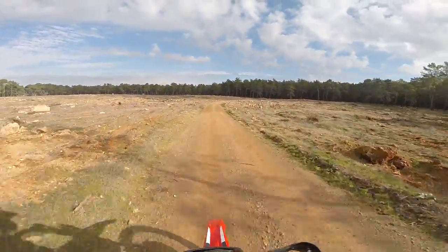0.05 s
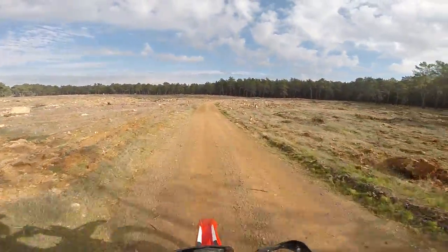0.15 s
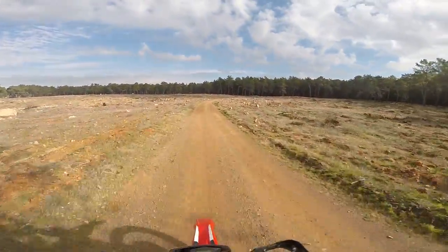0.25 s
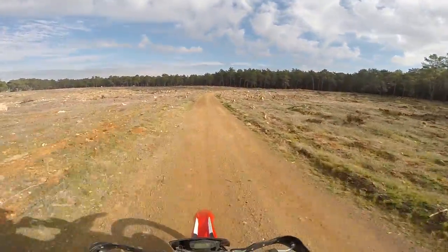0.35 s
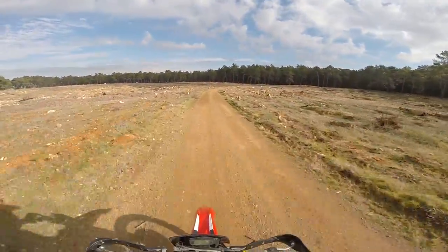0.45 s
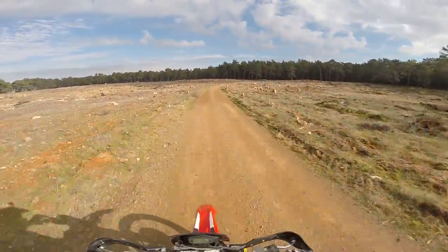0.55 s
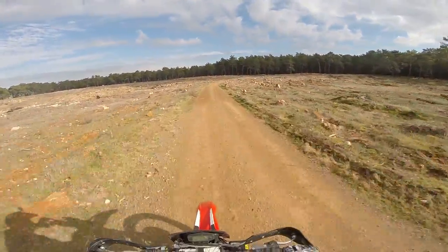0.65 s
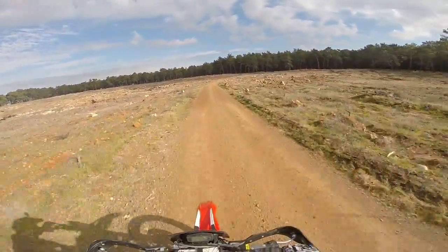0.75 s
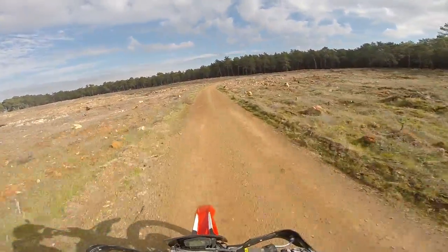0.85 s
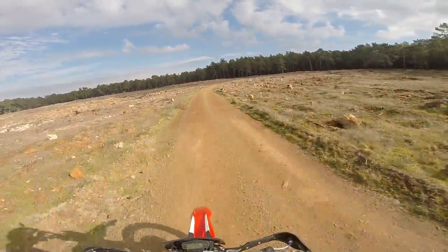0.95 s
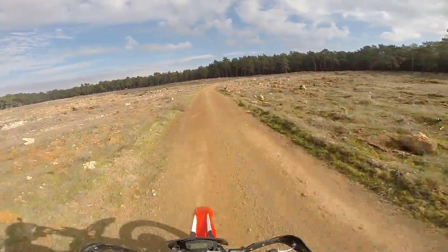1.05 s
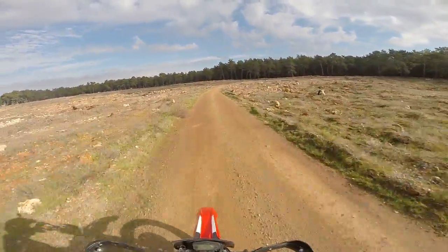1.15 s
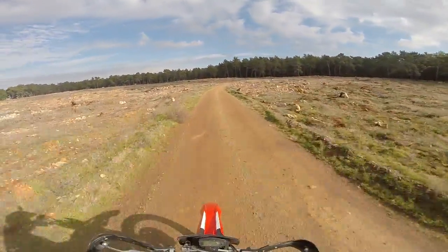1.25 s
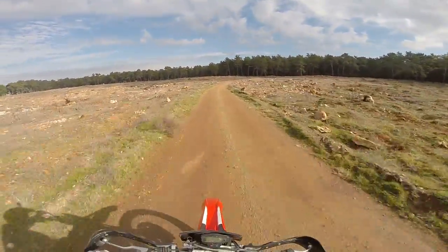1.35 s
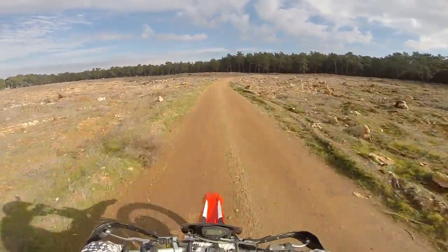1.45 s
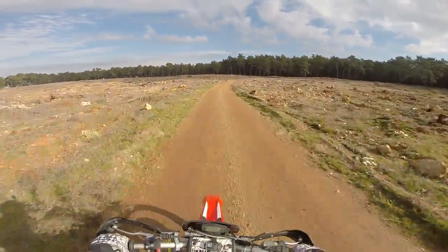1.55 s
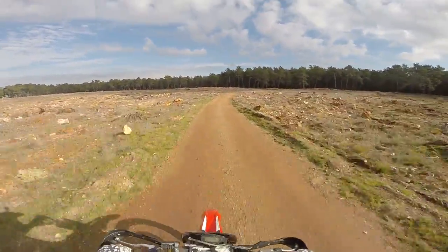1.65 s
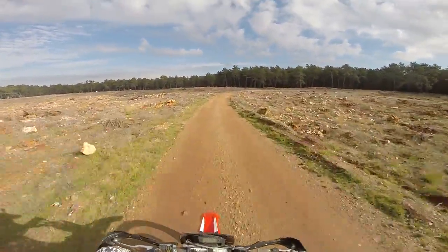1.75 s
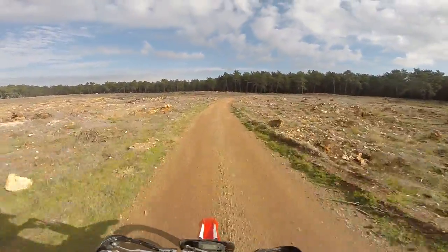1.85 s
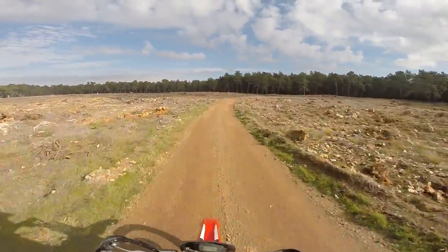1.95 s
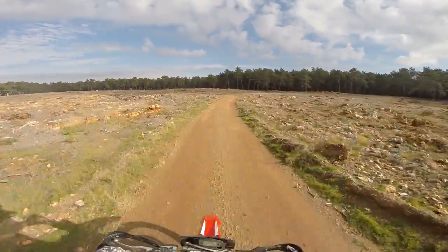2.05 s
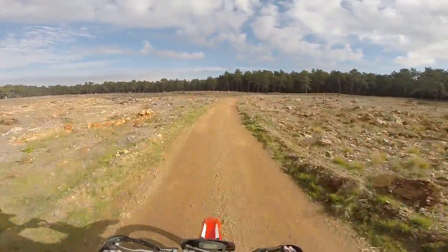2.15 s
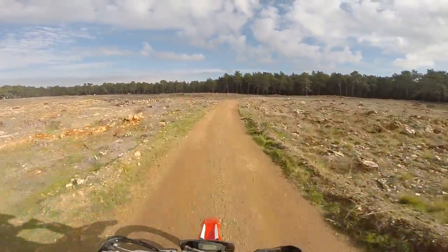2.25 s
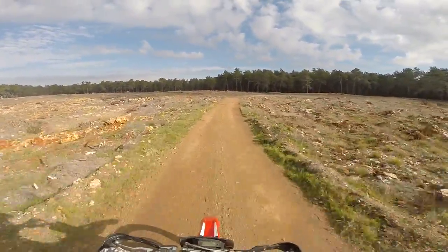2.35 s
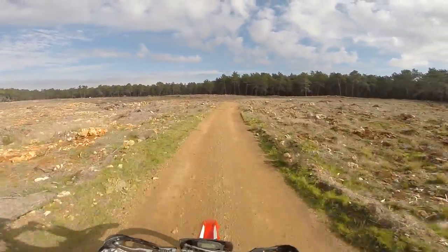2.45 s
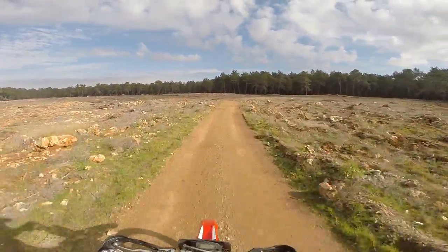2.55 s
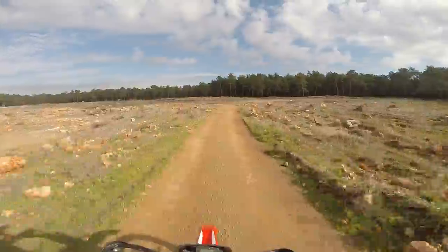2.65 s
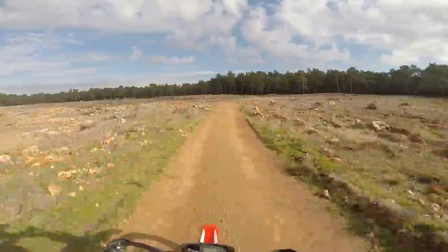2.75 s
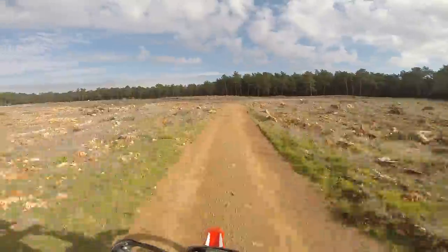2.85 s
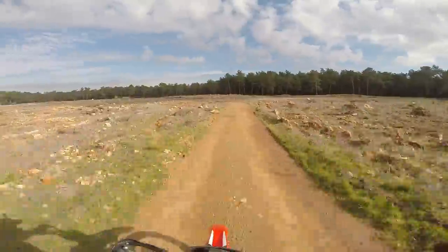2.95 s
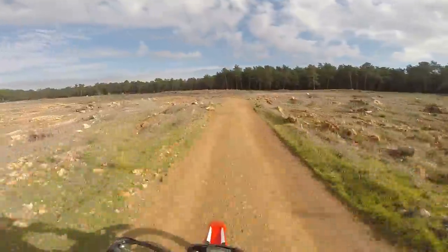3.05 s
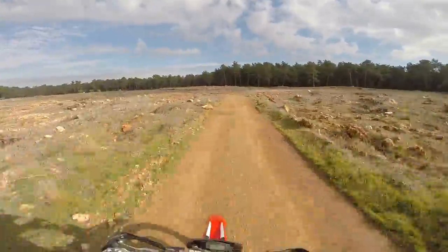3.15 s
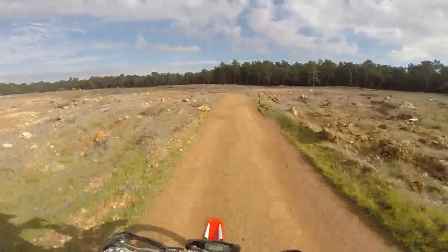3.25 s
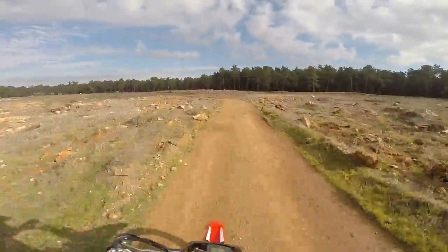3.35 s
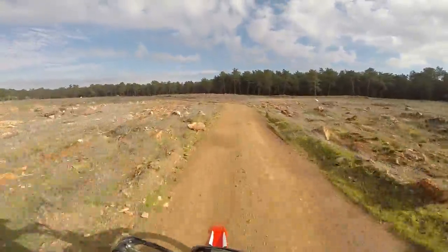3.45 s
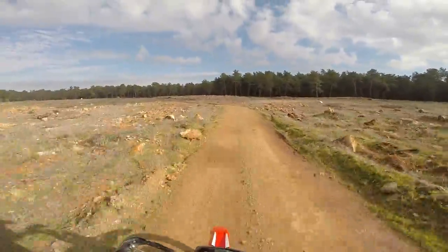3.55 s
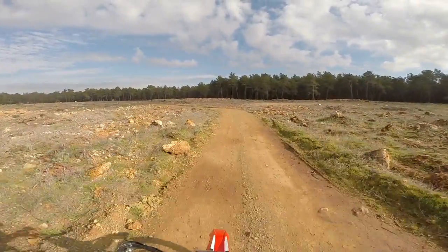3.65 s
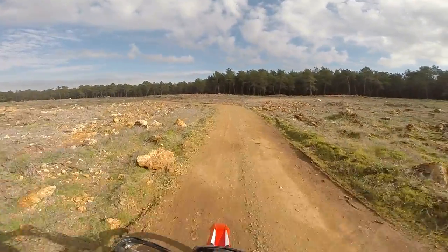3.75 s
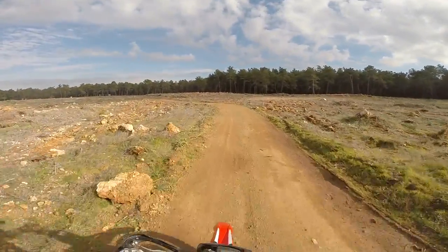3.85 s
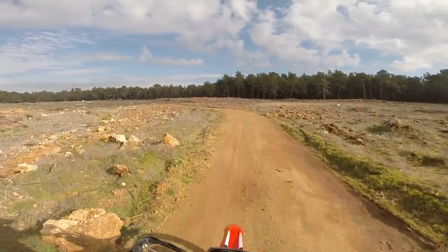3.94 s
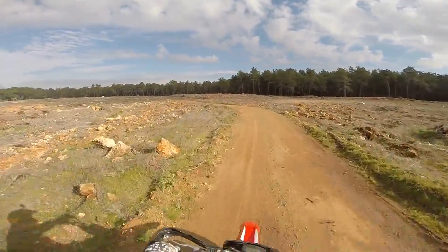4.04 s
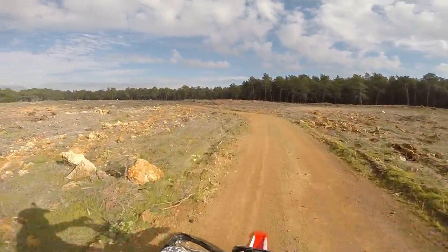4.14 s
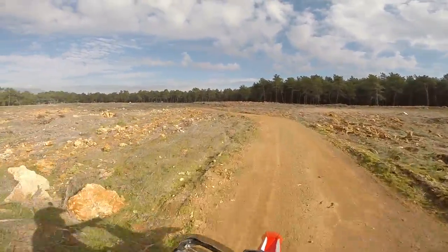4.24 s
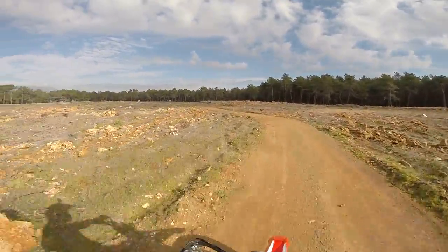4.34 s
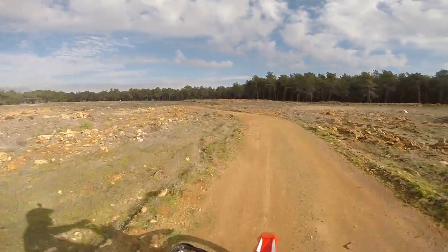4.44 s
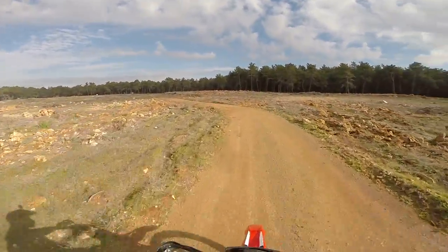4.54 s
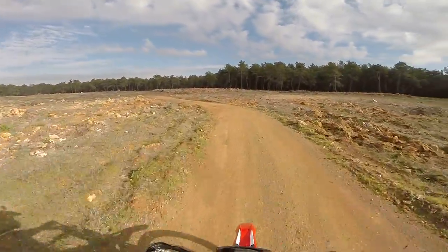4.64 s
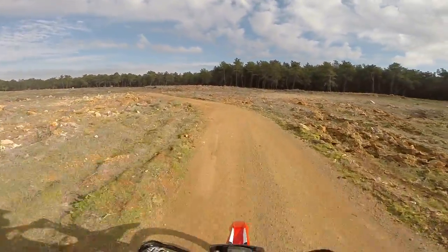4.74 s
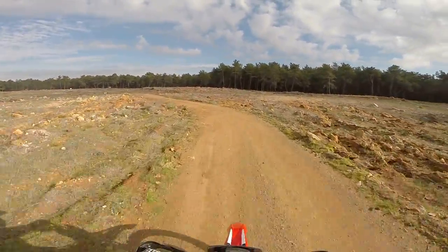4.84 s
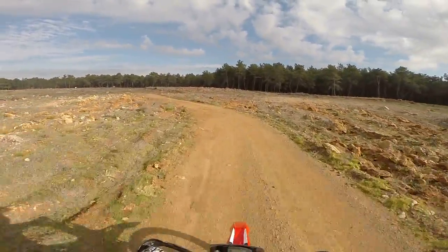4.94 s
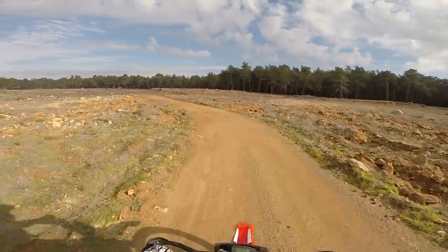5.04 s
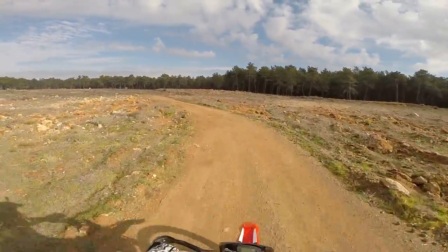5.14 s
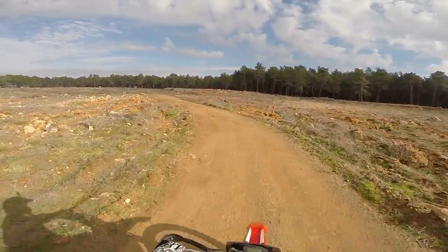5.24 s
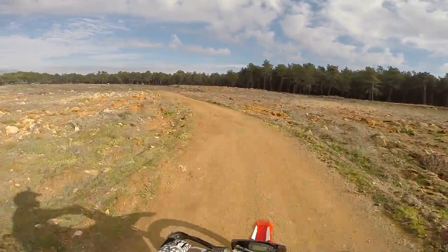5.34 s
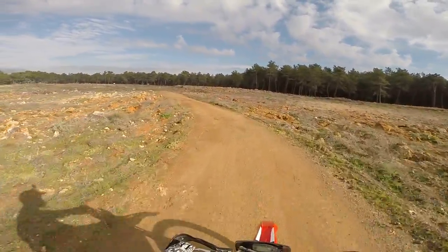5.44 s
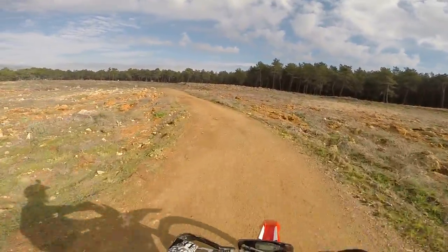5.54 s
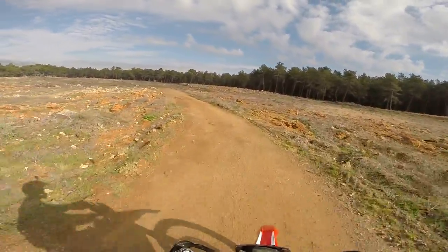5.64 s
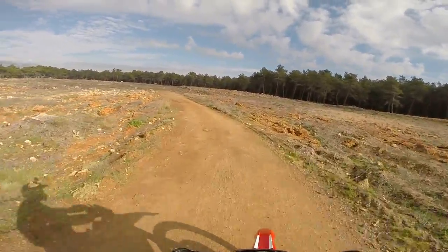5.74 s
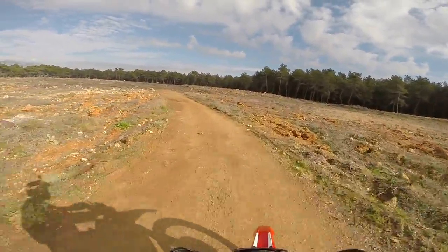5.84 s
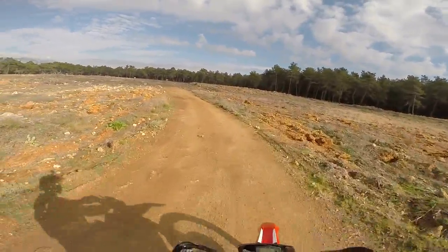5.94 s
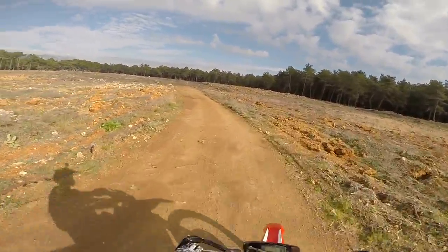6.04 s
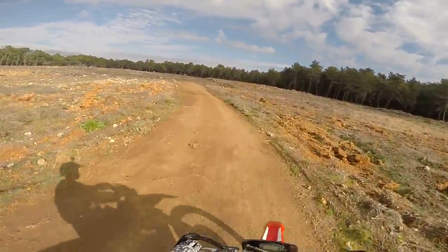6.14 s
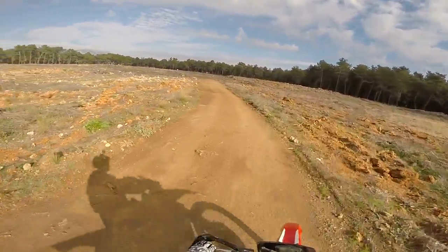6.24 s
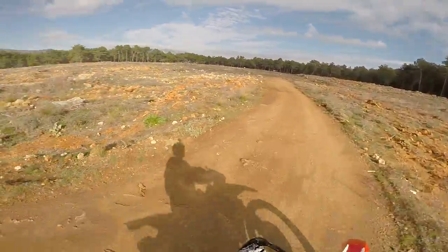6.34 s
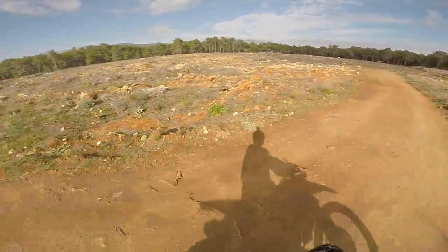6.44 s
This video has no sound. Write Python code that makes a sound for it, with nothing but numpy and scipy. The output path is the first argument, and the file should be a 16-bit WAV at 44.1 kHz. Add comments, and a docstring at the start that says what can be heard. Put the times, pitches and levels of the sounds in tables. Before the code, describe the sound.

Dirt bike engine pulls up through the revs, drops at a gear change, then runs down as helmet wind fades, with brake squeaks and a tyre groan.

```python
"""A single-cylinder dirt bike on a dirt trail, heard from a camera on the rider's helmet.
The engine, a sum of firing harmonics with noise bursts, pulls up through the revs, then runs down.
Wind is noise through the resonances of camera case and helmet, over a soft steady bed of coloured noise.
Grit rings the case as decaying sines, and a hard hit makes the limiter duck. Brake squeaks are gliding
sines; the rear tyre's knobs hum and slow under the brake, amid a low rumble of narrow-band noise."""
import sys
import numpy as np
from scipy import signal
from scipy.fft import rfft, irfft
from scipy.io import wavfile
from scipy.ndimage import uniform_filter1d

SR = 44100
rng = np.random.default_rng(int(sys.argv[2]) if len(sys.argv) > 2 else 0)


def master_out(mix):
    """Clip the mix to full scale and print it as 16-bit PCM to the path in sys.argv[1]."""
    frames = np.transpose(np.atleast_2d(mix))
    ceiling = np.clip(frames, -1, 1)
    pcm = np.round(ceiling * 32767).astype(np.int16)
    wavfile.write(sys.argv[1], SR, pcm)


N = 286204
TIME = np.arange(N) / SR
FREQ = np.maximum(np.fft.rfftfreq(N, 1 / SR), 1)

# resonances of the camera case: centre_hz, width_hz, relative_gain_db
CASE_MODES = [(1216, 104, -14.5), (1554, 202, -0.27), (2070, 566, -4), (2513, 243, -1), (2716, 130, -0.5),
              (3354, 306, -1.5), (3556, 220, 0), (4040, 595, -11.5), (5136, 230, -15), (5720, 770, -13.5),
              (7580, 1250, -24.5), (9000, 1430, -30), (10390, 1150, -29), (13800, 1500, -42.5)]
# strength of the air stream, dying away as the bike slows: time_s, rush_db
AIR_STREAM = [(0, -18.5), (.3, -16), (1.0, -20), (1.43, -14.5), (1.6, -16), (2.8, -16), (3.6, -20.5),
              (4.15, -23), (4.75, -26.5), (5, -29), (5.85, -32), (6.49, -40)]


def from_db(db):
    """Decibels to amplitude gain: 20 dB is a factor of ten."""
    return 10 ** (np.asarray(db) / 20)


def rms_one(x):
    """Normalise the mean power: scale to rms 1."""
    return x / np.sqrt(np.mean(x ** 2) + 1e-20)


def in_time(rows):
    """Linear interpolation: each column of a curve at every sample."""
    s, *columns = np.transpose(rows)
    return [np.interp(TIME, s, column) for column in columns]


def at_hz(spectrum, hz):
    """Interpolation on a logarithmic frequency axis: level of an outline at the given frequencies."""
    points_hz, db = np.transpose(spectrum)
    return np.interp(np.log(hz), np.log(points_hz), db)


def swells(rows):
    """Raised-cosine envelopes: a smooth bump for each row of centre_s, length_s, height."""
    total = 0
    for s, length_s, height in rows:
        half_turns = np.clip((TIME - s) / length_s, -.5, .5)
        total = total + height * np.cos(np.pi * half_turns) ** 2
    return total


def drift(rate_hz):
    """Low-passed noise: slow random wandering of rms 1, from two equal poles at rate_hz."""
    step = 20  # computed at every 20th sample, then interpolated
    r = np.exp(-2 * np.pi * rate_hz * step / SR)
    noise = rng.standard_normal(N // step + 2002)
    slow = signal.lfilter([1], [1, -2 * r, r * r], noise)[2000:]  # drop the filter's start
    return np.interp(np.arange(N) / step, np.arange(len(slow)), rms_one(slow))


def coloured(x, spectrum):
    """Spectral shaping: multiply the spectrum by an outline."""
    return irfft(rfft(x) * from_db(at_hz(spectrum, FREQ)), N)


def resonate(x, hz, width_hz):
    """Two equal resonators in cascade: about unit gain on top, steep skirts."""
    # each section is wider, so that the pair together has the given width
    r = np.exp(-np.pi * width_hz / np.sqrt(np.sqrt(2) - 1) / SR)
    gain = (1 - r * r) / 2
    section = [gain, 0, -gain, 1, -2 * r * np.cos(2 * np.pi * hz / SR), r * r]
    return signal.sosfilt([section, section], x)


def evened(x, span_s):
    """Running power normalisation: hold the rms over each span at 1."""
    power = uniform_filter1d(x * x, max(int(span_s * SR), 2))
    return x / np.sqrt(np.maximum(power, 1e-12))


def exhaust(rate, cycles, throttle, rough=0.18, count=26):
    """Fourier synthesis: firing harmonics in scattered phase, fluttering with uneven combustion."""
    # exhaust as it reaches the helmet, throttle open: frequency_hz, relative_db
    pulling = [(25, -14), (46, 5.5), (70, -6.5), (92, 5.5), (130, -3.5), (180, -1.5), (225, 1), (285, -2),
               (335, -13.5), (440, -2), (560, -13), (700, -11.5), (790, -5), (930, -21.5), (1220, -3.5),
               (2400, -2)]
    # the same, throttle shut: frequency_hz, relative_db
    coasting = [(22, -18), (45, -7.5), (62, 2.5), (90, -4.5), (120, -2), (175, -2.5), (230, -14.5),
                (285, -17), (345, -23), (405, -11.5), (470, -26), (550, -25.5), (1500, -25)]
    out, power = 0, 0
    for k in np.arange(count) + 1:
        open_db, shut_db = at_hz(pulling, k * rate), at_hz(coasting, k * rate)
        gain = from_db(throttle * open_db + (1 - throttle) * shut_db)
        phase = 2 * np.pi * (k * cycles + rng.random())  # the silencer smears the phases
        in_phase = np.cos(phase) * (1 + rough * drift(16.0))
        quadrature = np.sin(phase) * rough * drift(22)
        out = out + gain * (in_phase + quadrature)
        power = power + gain ** 2 * (.5 + rough ** 2)
    return out / np.sqrt(power)


def engine(rasp_db=-7.5, load_rasp_db=12.0, rasp_decay=1.0, exhaust_db=-1.0):
    """Periodic excitation: the exhaust note, and valve and gas rasp that decays after each firing."""
    # pulling up, changing gear and running down: time_s, firings_per_s
    engine_speed = [(0, 45.3), (.14, 46.5), (.5, 47.8), (.75, 55.5), (.92, 58.8), (1.02, 62.5),
                    (1.12, 69.9), (1.3, 74.6), (1.5, 76.3), (1.6, 55.5), (1.85, 57), (3.25, 46.3),
                    (4.05, 40.8), (4.7, 33), (5.3, 29.5), (6.49, 21.6)]
    # eased at the gear change and low thereafter: time_s, throttle_0_to_1
    throttle_curve = [(0, 0.87), (.45, .75), (.6, 0.97), (1.48, 0.97), (1.56, 0.06), (2.5, 0.24),
                      (3.4, 0.2)]
    # common level before the exhaust and rasp trims, at throttle 0 and the middling speed
    base_db, middle_firings_per_s = -35, 52
    load_db, rev_db_per_octave = 6.5, 3.5

    rate, = in_time(engine_speed)
    throttle = np.clip(in_time(throttle_curve)[0], 0, 1)
    octaves = np.log2(rate / middle_firings_per_s)
    level_db = base_db + load_db * throttle + rev_db_per_octave * octaves
    cycles = np.cumsum(rate) / SR
    bursts = rng.standard_normal(N) * np.exp(-rasp_decay * (cycles % 1))
    rasp = 0
    for k, (hz, width_hz, db) in enumerate(CASE_MODES[:10]):
        rasp = rasp + (-1) ** k * from_db(db) * resonate(bursts, hz, width_hz)
    note = from_db(exhaust_db) * exhaust(rate, cycles, throttle)
    rasp = from_db(rasp_db + load_rasp_db * throttle) * rms_one(rasp)
    return from_db(level_db) * (note + rasp)


def wind_rush(hiss_db=28.5, flutter_db=0.23, patchy_db=0.66, grain_db=1.0, rush_db=-0.22, broad_db=-15.5):
    """Turbulent excitation of resonances: the high case modes follow the fine hiss of the stream."""
    # level of the high hiss, before the hiss_db offset: time_s, relative_db
    hiss_curve = [(0.0, -51.5), (0.196, -47), (0.48, -45), (1.1, -44.5), (1.26, -43), (1.74, -46),
                  (3.11, -44), (3.23, -47), (4.04, -51), (4.39, -48.5), (4.87, -61), (5.86, -67.5),
                  (6.49, -79)]
    # the stream surges or slackens briefly: centre_s, length_s, change_db
    surges = [(.07, 0.15, -5.5), (3.02, 0.33, -3), (3.25, 0.34, 2), (3.74, 0.081, -3), (4.3, .2, -2),
              (4.63, 0.25, 1), (5.0, 0.25, -2.5), (5.3, .2, 3), (6.1, .18, -3), (6.23, 0.26, 2.5)]
    # broad turbulence under the resonances: frequency_hz, relative_db_per_hz
    turbulence = [(30, 3), (70, -6), (130, 4), (210, -16.5), (280, -6.5), (500, -11.5), (950, -11),
                  (1500, -13), (3800, -15), (5000, -37), (9000, -30.5), (15000, -60)]

    rush = in_time(AIR_STREAM)[0] + swells(surges)
    hiss = in_time(hiss_curve)[0] + hiss_db
    out, steady = 0, 0
    for hz, width_hz, db in CASE_MODES:
        mode_db = db + patchy_db * drift(17.4) + grain_db * drift(165)
        mode = from_db(mode_db) * resonate(rng.standard_normal(N), hz, width_hz)
        high = np.clip(np.log2(hz / 3200) / 0.59, 0, 1)  # 0 follows the rush, 1 the hiss
        out = out + mode * from_db((1 - high) * rush + high * hiss)
        steady = steady + mode
    broad = from_db(rush + broad_db) * rms_one(coloured(rng.standard_normal(N), turbulence))
    return from_db(rush_db + flutter_db * drift(25)) * out / np.std(steady) + broad


def wind_rumble(throb_span_s=0.18):
    """Beating of close modes: helmet resonances throb, and eddies thump on the microphone."""
    # resonances of the helmet: centre_hz, width_hz, relative_gain_db
    helmet_modes = [(165.1, 14.5, 2), (184.8, 16.9, -1.5), (122, 66, -14.5), (427, 42, -29), (617, 29, -25)]
    # spectrum of the eddies: frequency_hz, relative_db_per_hz
    eddy_spectrum = [(5, -4), (12, 2), (25, -6), (42, -5.5), (58, -18), (120, -24), (300, -48),
                     (2000, -110)]
    # the strongest booms in the helmet: centre_s, length_s, rise_db
    booms = [(.32, 0.066, 3), (1.03, .14, 5), (1.533, .12, 7.5), (1.652, 0.099, 7.5), (2.8, 0.37, 2.5),
             (3.033, 0.24, 5.5)]
    # gusts that thump on the microphone: centre_s, length_s, rise_db
    gusts = [(1.775, .26, 14), (2.9, 0.45, 5), (3.92, 0.52, 13), (4.102, .2, 16), (4.4, 0.28, 15.5),
             (5.714, 0.14, 10)]
    # levels at the reference rush, and the share of the rush's swing that each follows
    reference_rush_db = -17
    boom_db, boom_follows = -26.5, 0.8
    buffet_db, buffet_follows = -35, 0.16

    stream_db = in_time(AIR_STREAM)[0] - reference_rush_db
    boom = boom_db + boom_follows * stream_db + swells(booms)
    buffet = buffet_db + buffet_follows * stream_db + swells(gusts)
    cavity = 0
    for hz, width_hz, db in helmet_modes:
        cavity = cavity + from_db(db) * resonate(rng.standard_normal(N), hz, width_hz)
    eddies = coloured(rng.standard_normal(N), eddy_spectrum)
    return from_db(boom) * evened(cavity, throb_span_s) + from_db(buffet) * evened(eddies, 0.19)


def noise_bed(level_db=-50.0):
    """Stationary coloured noise: a soft steady bed beneath everything."""
    # frequency_hz, relative_db
    outline = [(100, -12), (300, -1), (750, -0.5), (1400, 5), (2000, -4), (4000, -19), (15000, -72)]
    return from_db(level_db) * rms_one(coloured(rng.standard_normal(N), outline))


def stones():
    """Impulse response as damped modes: grit ticks on the case; soft clods ring chiefly its low modes."""
    # grit on the case: start_s, strength_db, brightness_db_per_octave
    grit = [(.2819, -22, 10), (.5133, 7.5, 3), (1.2526, -20, 9), (1.5919, -25, 11), (1.6744, -12.5, -10.5)]
    # what a grain sets ringing: frequency_hz, relative_db, t60_s
    case_ringing = [(754, -34, 0.013), (1610, -15, 0.017), (2540, -7, 0.014), (3580, -11.5, .008),
                    (5250, -9.5, 0.0073), (6440, -10.5, 0.0082), (7584, -7, 0.0077), (8460, -14.5, 0.015),
                    (9190, -10, 0.012), (10870, -8, 0.0031), (13500, -13, 0.0033)]
    out, t = np.zeros(N), TIME[:SR // 20]
    for s, strength_db, tilt_db in grit:
        i = int(s * SR)
        for k, (hz, db, t60_s) in enumerate(case_ringing):
            decay = np.exp(-np.log(1000) * t / t60_s)
            gain = from_db(strength_db + db + tilt_db * np.log2(hz / 7000))
            out[i:i + len(t)] += (-1) ** k * gain * decay * np.sin(2 * np.pi * hz * t)
    return out


def squeaks(waver=.009):
    """Frequency modulation: the pad grazes the disc in short wavering whistles."""
    # brake disc squeaks: start_s, length_s, start_pitch_hz, end_pitch_hz, peak_level_db
    whistles = [(2.33, .025, 9120, 9050, -39), (2.495, 0.037, 8700, 9080, -34),
                (2.62, 0.015, 8950, 8750, -38), (2.7, 0.043, 8950, 9200, -35),
                (2.737, 0.09, 8800, 8900, -29.5), (2.822, 0.041, 8580, 8750, -28),
                (2.865, .018, 8800, 8500, -27.5), (2.881, 0.037, 7100, 7100, -30)]
    out, wobble = np.zeros(N), 1 + waver * drift(120)
    for s, length_s, start_hz, end_hz, db in whistles:
        i, n = int(s * SR), int(length_s * SR)
        pitch_hz = np.linspace(start_hz, end_hz, n) * wobble[i:i + n]
        phase = 2 * np.pi * np.cumsum(pitch_hz) / SR
        out[i:i + n] += from_db(db) * np.sin(phase) * signal.windows.tukey(n, .5)
    return out


def low_rumble(level_db=-32.0, middle_s=3.45, length_s=1.3, centre_hz=100, width_hz=60):
    """Narrow-band noise: a soft low rumble that swells and fades around the hum."""
    rumble = rms_one(resonate(rng.standard_normal(N), centre_hz, width_hz))
    return from_db(level_db) * swells([(middle_s, length_s, 1)]) * rumble


def tyre(waver=0.0206, rough_db=2.0, octave_db=-30):
    """Periodic impact tone: knobs slap the ground at a rate set by the wheel's speed."""
    # knobbly rear tyre spinning up, then braked: time_s, knobs_per_s, level_db
    knob_curve = [(3.17, 236, -41), (3.29, 240, -33.5), (3.51, 252, -32.5), (3.615, 203, -22),
                  (3.645, 183, -13), (3.7, 158.5, -19), (3.735, 103, -25.5), (3.85, 83, -38)]
    rate, level_db = in_time(knob_curve)
    phase = 2 * np.pi * np.cumsum(rate * (1 + waver * drift(30))) / SR
    gripping = (TIME > knob_curve[0][0]) & (TIME < knob_curve[-1][0])
    tone = np.sqrt(2) * (np.sin(phase) + from_db(octave_db) * np.sin(2 * phase))
    return gripping * from_db(level_db + rough_db * drift(32.9)) * tone


def scene():
    """Superposition: every source adds at one microphone."""
    engine_and_air = engine() + wind_rush() + wind_rumble() + noise_bed()
    grit_brake_and_tyre = stones() + squeaks() + low_rumble() + tyre()
    return (engine_and_air + grit_brake_and_tyre)[None]


def limiter(x, ceiling_db=0.0, release_db_per_s=15.5, ahead_s=.0195):
    """Peak limiting: looks ahead, ducks at once for a peak over the ceiling and recovers slowly."""
    over_db = np.maximum(20 * np.log10(np.abs(x).max(axis=0) + 1e-9) - ceiling_db, 0)
    release_db = release_db_per_s * TIME
    held_db = np.maximum.accumulate(over_db + release_db) - release_db
    return x * from_db(-np.interp(TIME + ahead_s, TIME, held_db))


def record(dry):
    """Band limiting: the camera limits the peaks, then a steep low-pass cuts the top."""
    cutoff_hz = 15300
    low_pass = signal.ellip(10, .2, 80, cutoff_hz, fs=SR, output="sos")
    return signal.sosfilt(low_pass, limiter(dry))


dry = scene()
out = record(dry)
master_out(out)
```